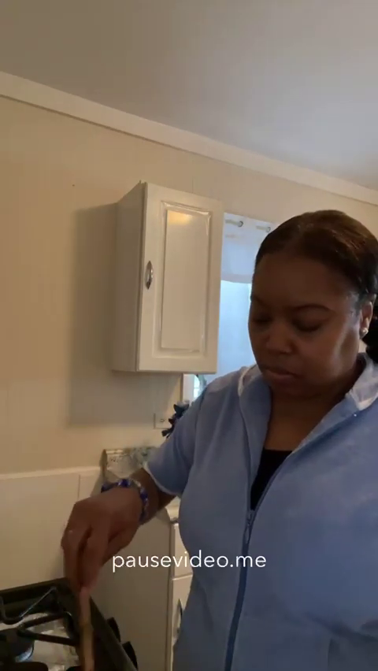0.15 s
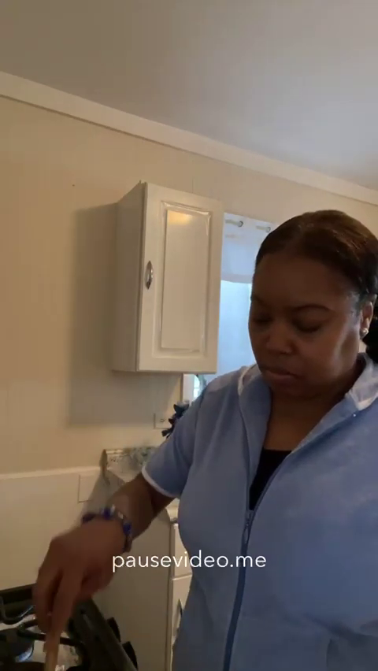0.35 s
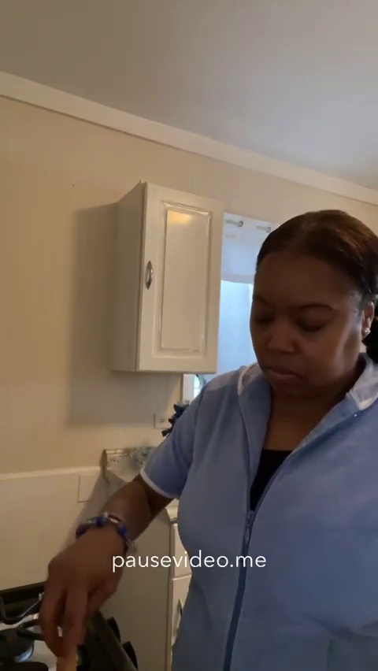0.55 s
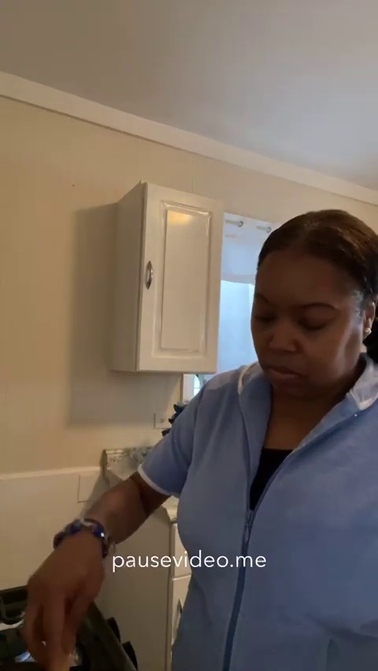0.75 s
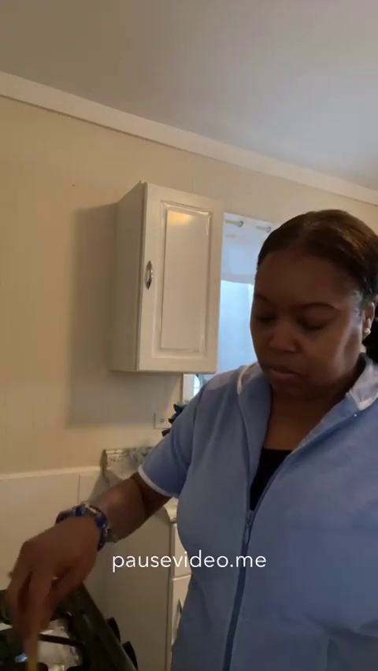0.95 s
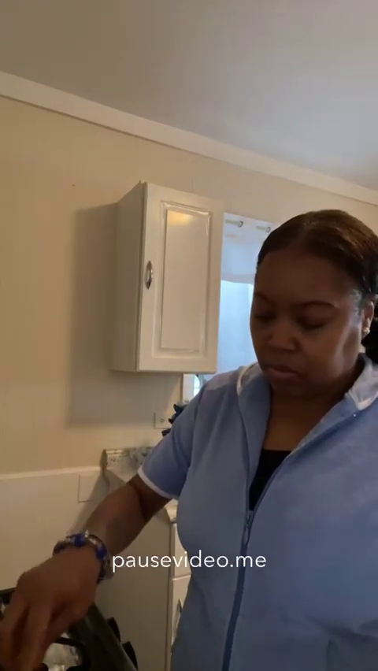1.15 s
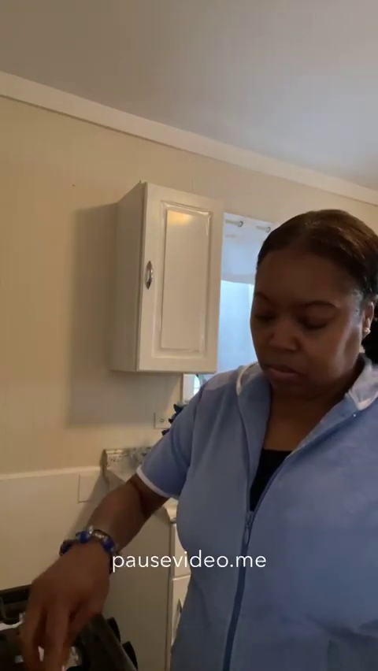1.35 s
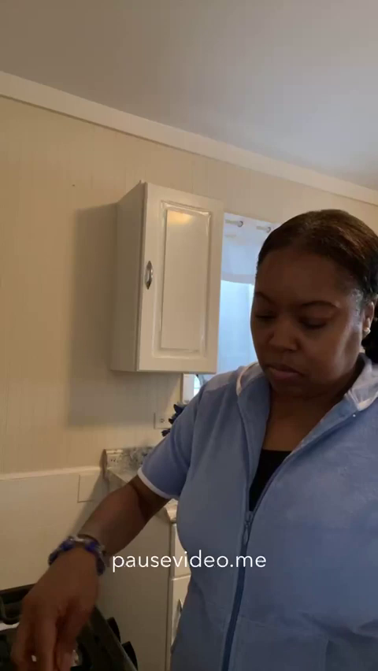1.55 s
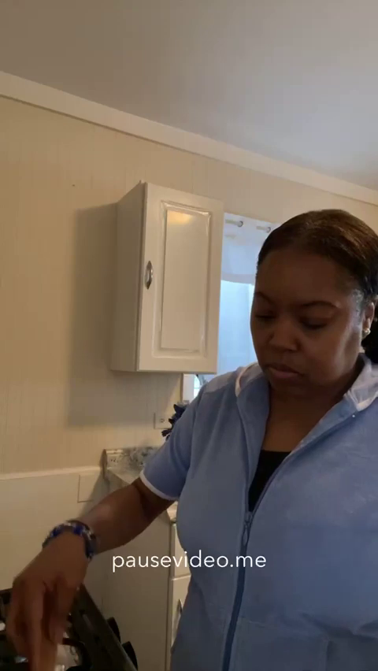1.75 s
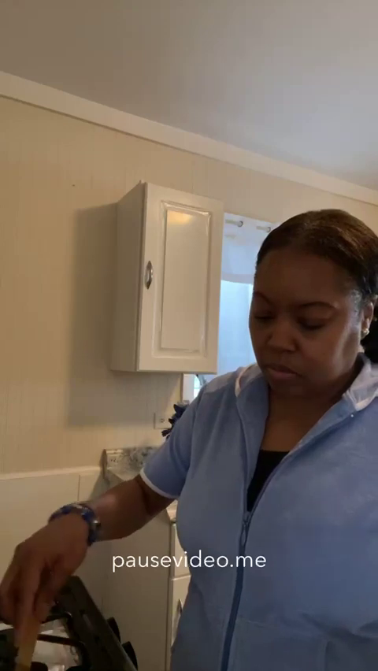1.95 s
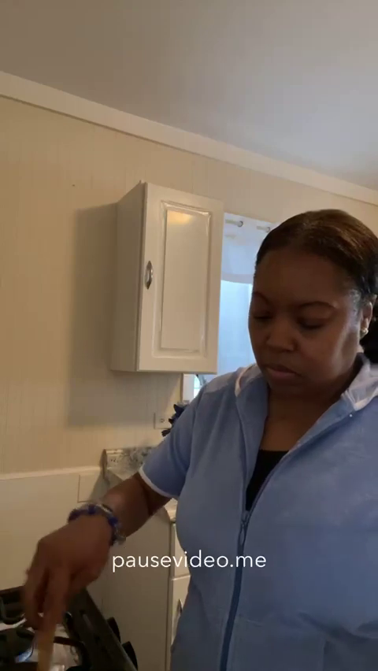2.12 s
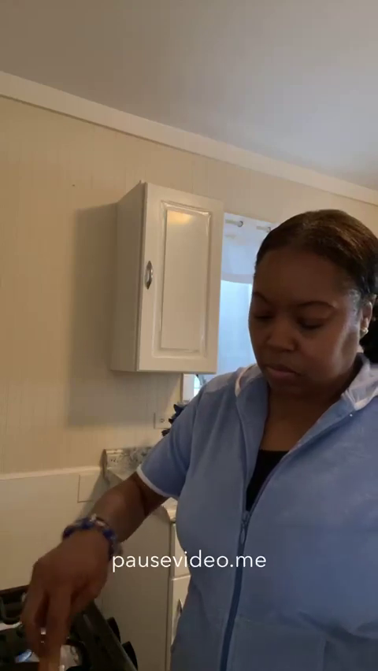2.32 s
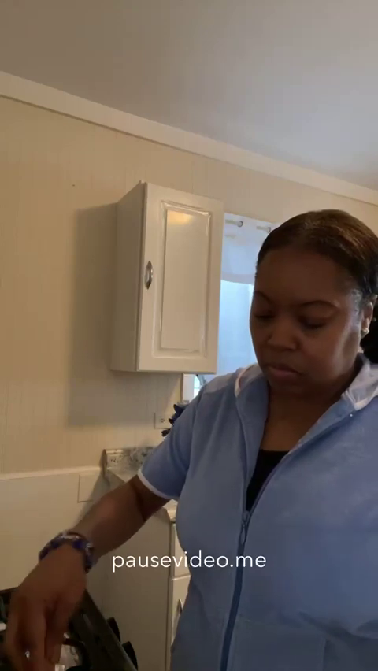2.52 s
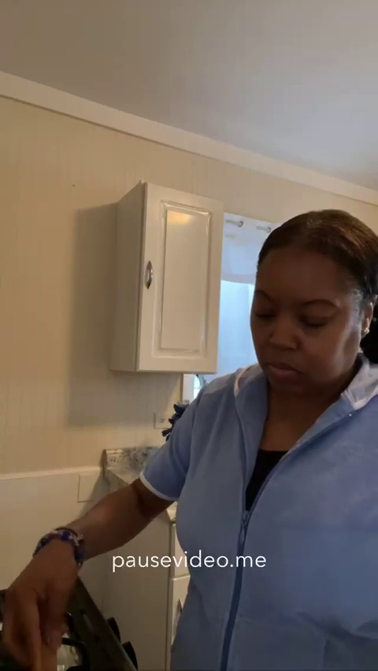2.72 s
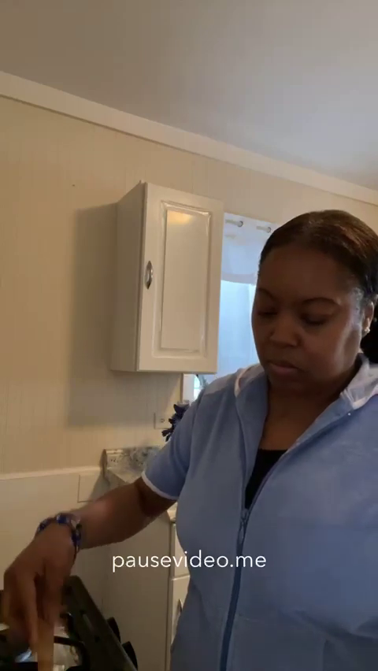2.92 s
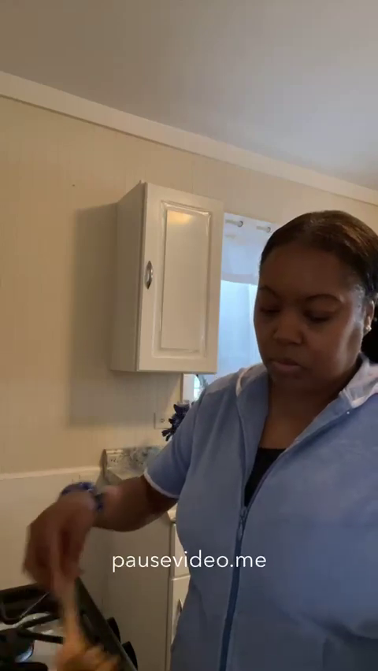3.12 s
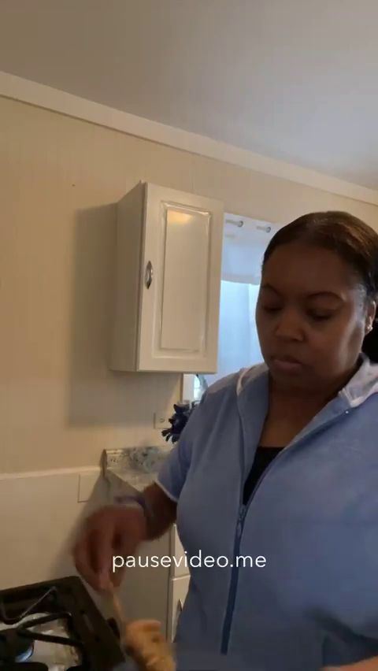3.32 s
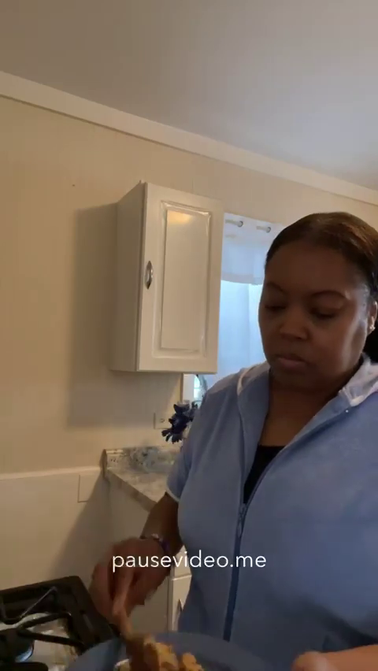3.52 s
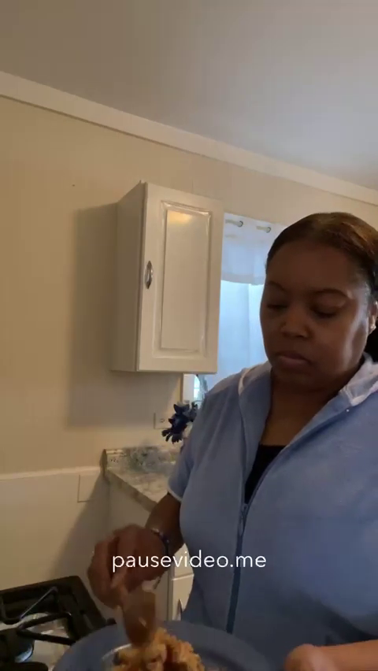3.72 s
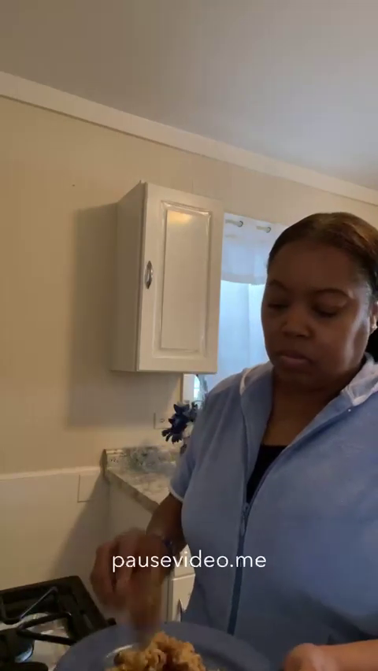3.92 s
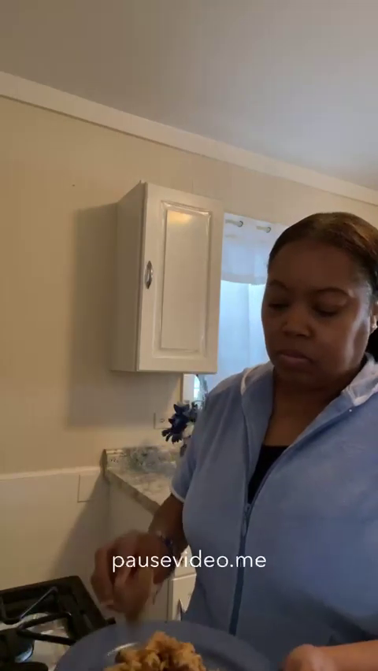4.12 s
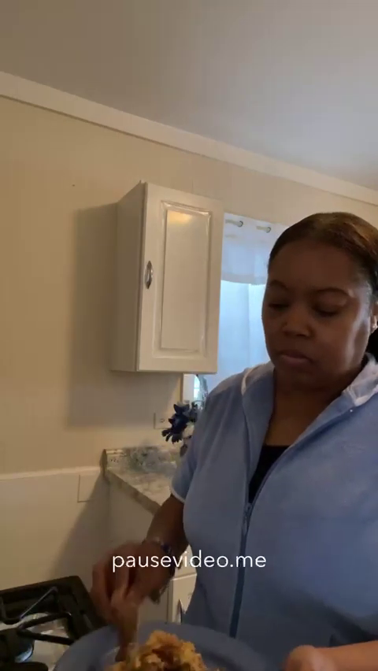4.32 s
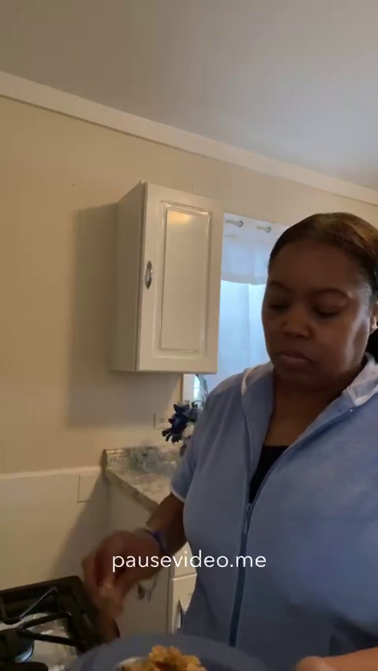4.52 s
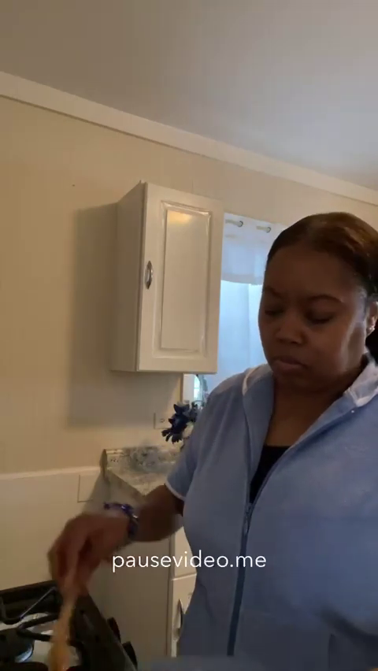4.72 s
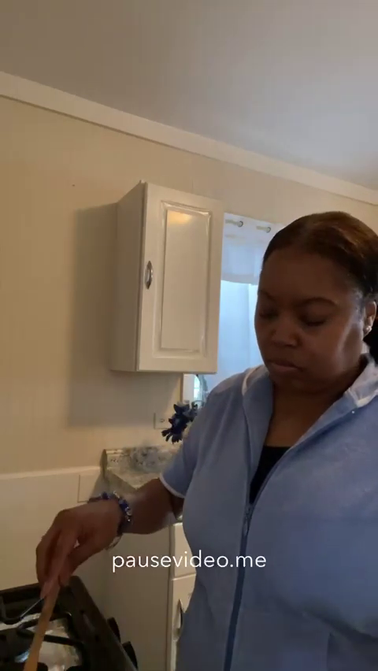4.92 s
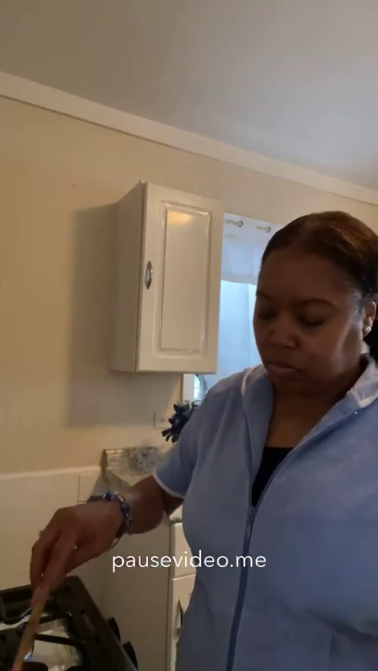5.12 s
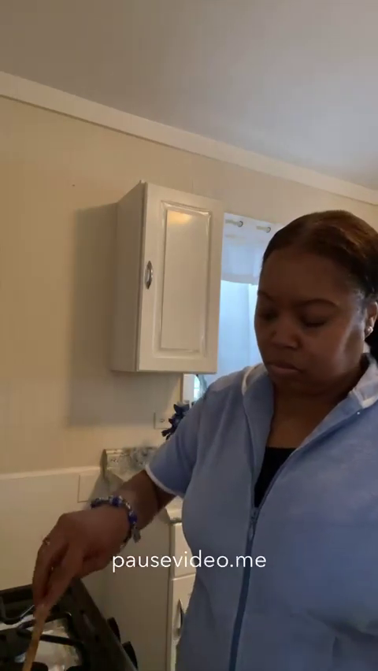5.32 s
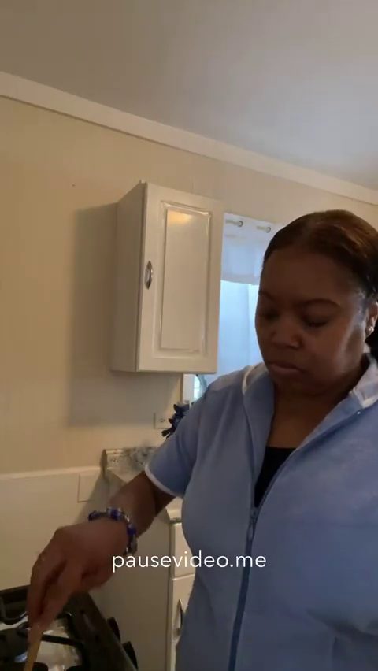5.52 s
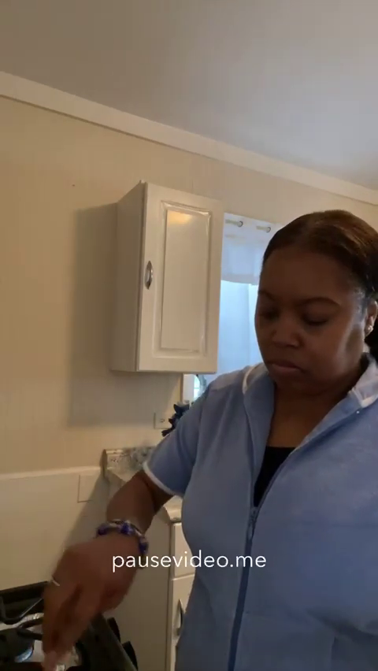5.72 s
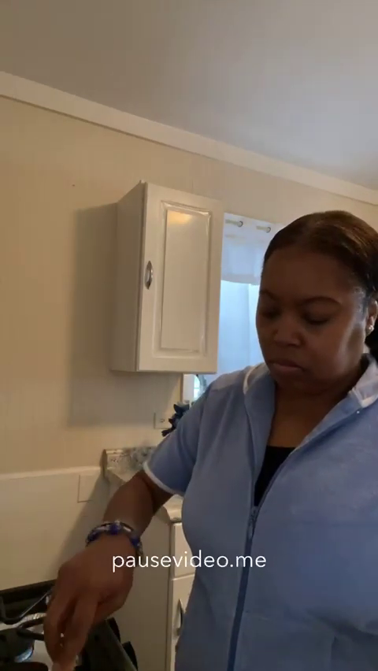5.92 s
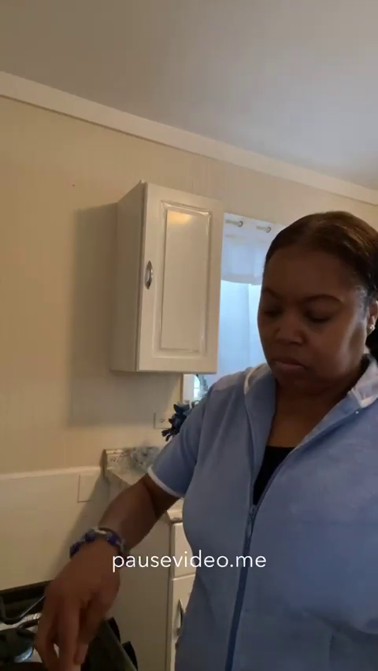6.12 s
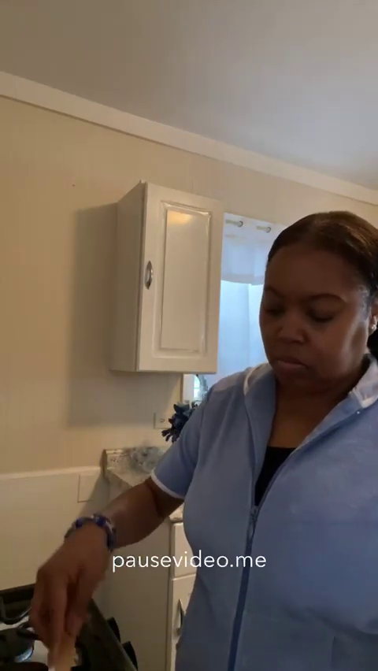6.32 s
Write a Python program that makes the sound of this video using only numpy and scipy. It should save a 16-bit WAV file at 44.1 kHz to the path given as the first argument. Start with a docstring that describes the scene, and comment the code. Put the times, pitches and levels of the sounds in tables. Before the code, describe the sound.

A low, quiet appliance hum runs throughout a small, lively kitchen. A beaded bracelet with tiny metal charms clicks and jingles as a wooden spoon scrapes and lightly taps a pot. After a lull, six hard, hollow knocks of the spoon on a hand-held plate ring out close to the microphone, by far the loudest sounds. Faint scrapes, a tap and jingles follow.

```python
"""Food is served from a pot in a small kitchen. Throughout, appliances hum (sines, filtered noise) and moist food
crackles (random impulses). From 0.3 s a bracelet jingles (clicks into bead and charm modes) while a wooden spoon
scrapes (runs of tiny slips) and taps the pot. At 3.5-4.3 s the spoon knocks six times on a hand-held plate (soft
clicks into its modes) to shake the food off; then jingles and scrapes go on. Wall echoes follow all but the hum."""
import sys
import numpy as np
from scipy import signal
from scipy.fft import rfft, irfft
from scipy.io import wavfile
from scipy.ndimage import uniform_filter1d, minimum_filter1d

SR = 44100
rng = np.random.default_rng(int(sys.argv[2]) if len(sys.argv) > 2 else 0)


def generate_wav(signal):
    """Clip the signal to [-1, 1] and save it as 16-bit WAV at the path in sys.argv[1]."""
    frames = np.transpose(np.atleast_2d(signal))
    scaled = np.clip(frames, -1, 1) * 32767
    pcm = np.round(scaled).astype(np.int16)
    wavfile.write(sys.argv[1], SR, pcm)


N = 280476
TIME = np.arange(N) / SR

# spoon blows on the plate [t/s, relative strength/dB, contact cut-off f/Hz]
PLATE_BLOWS = [(3.4824, -5, 3308), (3.646, -5.5, 2900), (3.7971, 0.2, 5570), (3.9794, 0.5, 8580),
               (4.1523, 2, 7000), (4.3254, -2.5, 3900)]


def from_db(db):
    """Decibels to amplitude gain."""
    return 10 ** (np.asarray(db) / 20)


def rms_one(x):
    """Scale to rms 1."""
    return x / np.sqrt(np.mean(x ** 2) + 1e-20)


def at_hz(points, hz):
    """Interpolate a table along a log-frequency axis."""
    table_hz, values = np.transpose(points)
    return np.interp(np.log(np.maximum(hz, 1)), np.log(table_hz), values)


def coloured(x, colour):
    """Filter by a smooth spectrum; rms 1."""
    gain = from_db(at_hz(colour, np.fft.rfftfreq(N, 1 / SR)))
    return rms_one(irfft(rfft(x) * gain, N))


def butterworth(x, order, hz, kind="low"):
    """Butterworth low- or high-pass."""
    return signal.sosfilt(signal.butter(order, hz, kind, fs=SR, output="sos"), x)


def clicks(times_s, levels_db):
    """One-sample impulses."""
    out = np.zeros(N) + 1e-18
    out[np.round(np.asarray(times_s) * SR).astype(int)] = from_db(levels_db)
    return out


def pole_pair(hz, radius):
    """Denominator of a two-pole resonator."""
    return [1, -2 * radius * np.cos(2 * np.pi * hz / SR), radius * radius]


def resonance(x, hz, width_hz):
    """Two-pole band-pass, gain 1 on top."""
    r = np.exp(-np.pi * width_hz / SR)
    return signal.lfilter(np.array([1, 0, -1]) * (1 - r * r) / 2, pole_pair(hz, r), x)


def ring(x, hz, t60_s):
    """Damped mode: a unit click starts a decaying sine of height 1."""
    r = np.exp(-np.log(1000) / (t60_s * SR))
    return signal.lfilter([0, np.sin(2 * np.pi * hz / SR)], pole_pair(hz, r), x)


def delay_band(x, hz, width_hz):
    """All-pass that holds back one band."""
    poles = pole_pair(hz, np.exp(-np.pi * width_hz / SR))
    return signal.lfilter(poles[::-1], poles, x)


def scatter(x, delay_s, feedback):
    """All-pass comb: a wave that runs to and fro, spread in time with its colour kept."""
    loop = np.zeros(round(delay_s * SR) + 1)
    loop[0], loop[-1] = 1, -feedback
    return signal.lfilter(loop[::-1], loop, x)


def grains(per_s, spread_db):
    """Random impulses of uneven size and either sign."""
    sizes = from_db(spread_db * np.minimum(rng.exponential(1, N), 4))
    return sizes * rng.choice([-1, 1], N) * (rng.random(N) < per_s / SR)


def appliances(waver):
    """Motor lines with a little narrow noise, a narrow wavering drone and a dull rush of air."""
    # steady motor lines [f/Hz, rms level/dB]
    motor_lines = [(59.2, -52), (126.5, -63), (154.3, -60), (355.3, -70.5), (473.7, -71), (1067, -78),
                   (1186, -75.5)]
    # colour of the air rush [f/Hz, relative level/dB]
    air_colour = [(15, -38), (25, -12), (59, -2), (105, -16), (149, -12.5), (195, -13), (249, -2.5),
                  (317, -14.5), (754, -15), (1070, -26.5), (1230, -20.5), (2350, -32.5), (7510, -38.5),
                  (11300, -50.5), (16000, -48)]
    air_db, drone_hz, drone_width_hz, drone_db = -54, 246.7, 9, -56.5

    hum = 0
    for hz, db in motor_lines:
        line = np.sqrt(2) * np.sin(2 * np.pi * (hz * TIME + rng.random()))
        unsteady = rms_one(resonance(rng.standard_normal(N), hz, width_hz=6))
        hum = hum + from_db(db) * (line + waver * unsteady)

    drone = resonance(rng.standard_normal(N), drone_hz, drone_width_hz)
    drone = rms_one(resonance(drone, drone_hz, width_hz=150))
    air = coloured(rng.standard_normal(N), air_colour)
    return hum + from_db(drone_db) * drone + from_db(air_db) * air


def food(level_db):
    """Moist food crackles faintly as the spoon moves it: dense random impulses."""
    # food shifting under the spoon [t/s, relative level/dB]
    stir_levels = [(0.0, -76), (0.53, -74.5), (1.11, -75.5), (1.4, -67.5), (1.79, -78.5), (3.31, -79),
                   (4.34, -72), (4.6, -82), (5.42, -82), (5.77, -71), (6.04, -68.5), (6.36, -83)]
    # crackle colour [f/Hz, relative level/dB]
    crackle_colour = [(3000, -12), (8000, -7), (11500, -10), (14000, -1), (16000, 0)]

    crackle = coloured(grains(per_s=3000, spread_db=5.5), crackle_colour)
    envelope_db = np.interp(TIME, *np.transpose(stir_levels))
    return from_db(envelope_db + level_db) * crackle


def bracelet_touches(faint_count, vary_db):
    """Touches from each wrist jolt, from the weaker swing back, and from small chance moves of the hand."""
    # wrist jolts [t/s, relative bead level/dB, first charm level/dB, second charm level/dB]
    wrist_jolts = [(0.3168, -34, -52.5, -59), (0.6534, -42, -57.5, -71), (0.7476, -25, -50.5, -53),
                   (1.1113, -24, -53.5, -57), (1.1364, -37, -61, -64), (1.199, -30, -53.5, -51.5),
                   (1.464, -46, -54, -60), (1.538, -31, -49.5, -59), (1.7677, -25.5, -51.5, -51.5),
                   (2.11, -50, -61, -59), (4.098, -39, -57, -62), (4.4618, -40, -47.5, -45.5),
                   (5.0772, -37, -45.5, -64), (5.5338, -45, -61, -47.5), (5.7768, -41, -70, -58),
                   (5.9968, -45, -59.5, -49.5), (6.182, -36, -62.5, -49.5)]
    # mean relative level/dB of a chance touch: beads, first charm, second charm
    faint_db = (-52.5, -69, -75.5)
    swing_s, swing_spread = .048, 0.27
    swing_loss_db = (12, 12, 9.5)   # beads, first charm, second charm

    jolts = np.array(wrist_jolts)
    delay_s = swing_s * (1 + swing_spread * rng.uniform(-0.87, 1, len(jolts)))
    swings = np.column_stack([jolts[:, 0] + delay_s, jolts[:, 1:] - swing_loss_db])

    # one chance touch at random in each equal share of the time
    faint_s = (np.arange(faint_count) + rng.random(faint_count)) / faint_count * TIME[-1]
    faint_levels = faint_db + vary_db * rng.standard_normal((faint_count, len(faint_db)))
    return np.vstack([jolts, swings, np.column_stack([faint_s, faint_levels])])


def beads(contacts, level_db):
    """Beads, damped against each other, touch and settle in rebounds that die out."""
    # bead modes [f/Hz, width/Hz, relative level/dB]
    bead_modes = [(10300, 400, -16), (13600, 420, 0), (14600, 1200, -8), (15500, 400, -4)]

    times_s, levels_db = np.transpose(contacts)[:2]
    # rebounds fade by 350 dB per second
    settling = signal.lfilter([1], [1, -from_db(-350 / SR)], clicks(times_s, levels_db - 18))
    touches = clicks(times_s, levels_db) + settling * grains(per_s=900, spread_db=3.0)
    return sum(from_db(level_db + db) * resonance(touches, hz, width_hz)
               for hz, width_hz, db in bead_modes)


def charms(contacts, first_db, second_db):
    """Two small metal charms ring thinly in lightly damped modes."""
    # first charm's modes [f/Hz, relative level/dB, t60/s]
    first_modes = [(7575, -7, 0.31), (7635, 4, 0.23), (13480, -4.5, 0.096), (13620, -8.5, .09)]
    # second charm's modes [f/Hz, relative level/dB, t60/s]
    second_modes = [(10170, -6, .07), (10220, -5, .12), (15540, -10, .1)]

    times_s, _, first_levels, second_levels = np.transpose(contacts)
    out = 0
    for modes, levels_db in ((first_modes, first_levels + first_db), (second_modes, second_levels + second_db)):
        for hz, db, t60_s in modes:
            uneven_db = rng.standard_normal(len(times_s))
            out = out + ring(clicks(times_s, levels_db + db + uneven_db), hz, t60_s)
    return out


def scrapes(level_db, catch_db):
    """The spoon catches the pot with a tick and slides to a stop in a run of tiny slips."""
    # spoon strokes in the pot [t/s, relative level/dB, fade t60/s]
    strokes = [(0.451, -53, .085), (0.7105, -49, .07), (0.748, -51, .21), (1.096, -52.5, .02),
               (1.111, -51, .2), (1.133, -53, .07), (1.462, -54, .2), (1.511, -49.5, .18),
               (2.617, -58, .14), (2.695, -53.5, .08), (4.172, -44.5, .087), (4.416, -46.5, .19),
               (5.777, -54, .05), (5.882, -52.5, .22), (6.092, -42, .03), (6.189, -53.5, .13)]
    # colour of wood rubbing on the pot [f/Hz, relative level/dB]
    rub_colour = [(900, -16), (2000, -2), (5000, 0), (8000, 0), (11500, -5), (14000, 1), (16000, 2)]

    slips, out = rms_one(grains(per_s=1100, spread_db=3.5)), np.zeros(N)
    for start_s, db, t60_s in strokes:
        start = round(start_s * SR)
        span = slice(start, start + SR // 2)
        stroke = slips[span] * np.exp(-np.log(1000) * (TIME[span] - start_s) / t60_s)
        stroke[0] = from_db(catch_db)
        out[span] += from_db(db) * stroke
    out = butterworth(out, 2, 16000)
    return from_db(level_db) * np.std(out) * coloured(out, rub_colour)


def taps(level_db):
    """The spoon's edge bumps the pot: a small dry click into broad woody modes."""
    # light taps [t/s, relative level/dB]
    tap_hits = [(0.709, -41), (1.521, -18.5), (1.77, -26.5), (5.924, -21.5)]
    # woody modes [f/Hz, width/Hz, relative level/dB]
    wood_modes = [(2280, 310, -15), (3550, 540, 0), (5130, 490, 1), (6600, 1400, -10)]

    force = clicks(*np.transpose(tap_hits))
    return sum((-1) ** k * from_db(level_db + db) * resonance(force, hz, width_hz)
               for k, (hz, width_hz, db) in enumerate(wood_modes))


def knocks(level_db, vary_db):
    """Each blow is a soft click into the plate's modes; its contact cut-off sets its brightness."""
    # modes of plate and spoon [f/Hz, width/Hz, relative level/dB]
    plate_modes = [(250, 96, 8.5), (471, 120, 8), (734, 90, 13), (1208, 130, 28), (1430, 380, 21),
                   (1800, 170, 26.5), (2100, 320, 21), (2535, 200, 24.5), (3006, 370, 21),
                   (3370, 301, 22.5), (3853, 210, 19.5), (4212, 150, 28), (4450, 340, 22.5),
                   (4940, 150, 23), (5240, 300, 19), (5600, 110, 22.5), (5900, 221, 16.5),
                   (7415, 213, 16.5), (8440, 392, 8), (9080, 380, 11), (9760, 230, 8.5), (10300, 600, -0.5),
                   (13200, 1800, -4.5), (14800, 700, 5)]

    force = np.array([butterworth(clicks([t_s], [db]), 2, cutoff_hz) for t_s, db, cutoff_hz in PLATE_BLOWS])
    # each blow excites the modes a little differently
    strengths = from_db(vary_db * rng.standard_normal((len(PLATE_BLOWS), len(plate_modes))))
    out = 0
    for k, (hz, width_hz, db) in enumerate(plate_modes):
        out = out + (-1) ** k * from_db(db) * resonance(strengths[:, k] @ force, hz, width_hz)

    # bending waves are slower at low pitch and return from the rim, so the blow spreads over a few ms
    out = delay_band(out, hz=1700, width_hz=4500)
    out = scatter(out, delay_s=.0004, feedback=.6)
    out = scatter(out, delay_s=.0009, feedback=.6)
    return from_db(level_db) * out


def ticks(level_db, growth_db_per_db, edge_hz):
    """Wood meeting the plate gives a tiny bright tick, more so in a hard blow."""
    times_s, strength_db, _ = np.transpose(PLATE_BLOWS)
    impulses = clicks(times_s, level_db + growth_db_per_db * strength_db)
    return scatter(butterworth(impulses, 2, edge_hz, "high"), delay_s=0.0011, feedback=.5)


def kitchen(x, first_echo_s, build_s):
    """Dense wall echoes set in a few ms after the sound and die away band by band."""
    # decay time [f/Hz, t60/s]
    decay_times = [(150, .42), (1000, .42), (2000, .45), (5000, .41), (9000, .34), (16000, .27)]
    # echo level against the sound fed in [f/Hz, level/dB]
    echo_levels = [(150, -3), (700, -4), (1200, -5.5), (2000, -4.5), (4000, -10), (8000, -1.5),
                   (16000, -10.5)]

    t = np.arange(SR) / SR
    hz = np.fft.rfftfreq(SR, 1 / SR)
    white = rfft(rng.standard_normal(SR))
    onset = np.clip((t - first_echo_s) / build_s, 0, 1)
    edges_hz, echo = np.geomspace(80, 20000, 21), 0
    for low, high in zip(edges_hz, edges_hz[1:]):
        centre = np.sqrt(low * high)
        decay = np.exp(-np.log(1000) * t / at_hz(decay_times, centre))
        band = irfft(white * (hz >= low) * (hz < high), SR) * onset * decay
        # at 0 dB the band has the energy of a unit click in it
        click_rms = np.sqrt(2 * (high - low)) / SR
        echo = echo + from_db(at_hz(echo_levels, centre)) * rms_one(band) * click_rms
    return signal.fftconvolve(x, echo)[:N]


def lingering_tones(plate):
    """Narrow kitchen resonances linger after a knock."""
    # kitchen resonances [f/Hz, level/dB]
    room_tones = [(747, 0), (1219, 2), (1316, 4), (1416, 4), (1462, 4), (1548, 4), (1678, 4), (1745, 5),
                  (1778, 1), (1958, 6), (2207, 5), (2241, 5), (2457, 3), (3856, 4), (4417, 4), (5291, 3),
                  (5644, 4)]
    return sum(from_db(db) * resonance(plate, hz, width_hz=9) for hz, db in room_tones)


def limiter(x, top):
    """Gain dips smoothly for a moment around any peak above the top."""
    gain = minimum_filter1d(top / np.maximum(np.abs(x), top), size=90)
    return x * uniform_filter1d(uniform_filter1d(gain, size=45), size=45)


def scene():
    """The plate is close by; the pot is farther off and wetter."""
    plate = knocks(level_db=2.0, vary_db=2.1) + ticks(level_db=-10, growth_db_per_db=2.4, edge_hz=13000)
    contacts = bracelet_touches(faint_count=9, vary_db=3)
    charm_rings = charms(contacts, first_db=4.0, second_db=2.5)
    beads_and_pot = beads(contacts, level_db=16.5) + scrapes(level_db=-2.0, catch_db=19.5)
    beads_and_pot += taps(level_db=3.5) + food(level_db=3.5)

    room_feed = plate + from_db(3) * beads_and_pot + from_db(-0.5) * charm_rings
    room = kitchen(room_feed, first_echo_s=0.0015, build_s=.003) + lingering_tones(plate)
    return (plate + beads_and_pot + charm_rings + room + appliances(waver=.11))[None]


def record(dry):
    """The microphone drops the deepest bass, the loudest peaks are held down, the top is cut."""
    thin = butterworth(dry, 3, 36, "high")
    held = limiter(thin, top=.93)
    top_cut = signal.ellip(10, .1, 80, 15800, fs=SR, output="sos")
    return signal.sosfilt(top_cut, held)


dry = scene()
out = record(dry)
generate_wav(out)
```